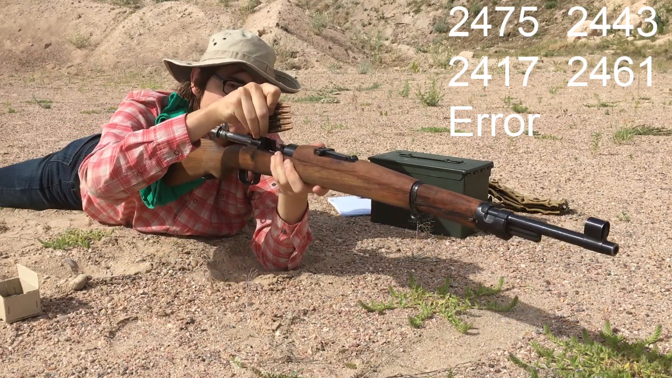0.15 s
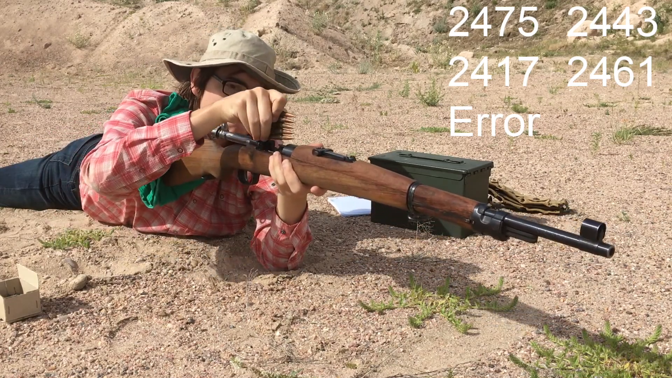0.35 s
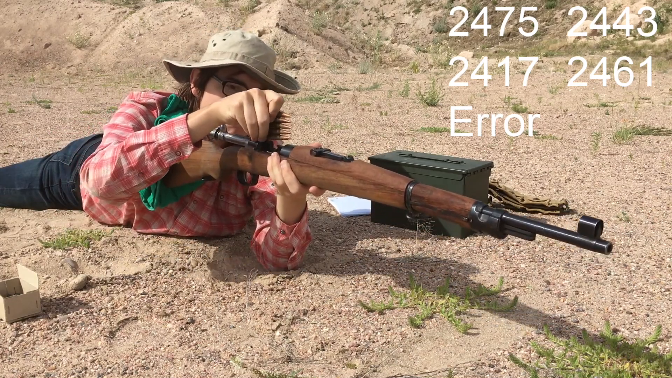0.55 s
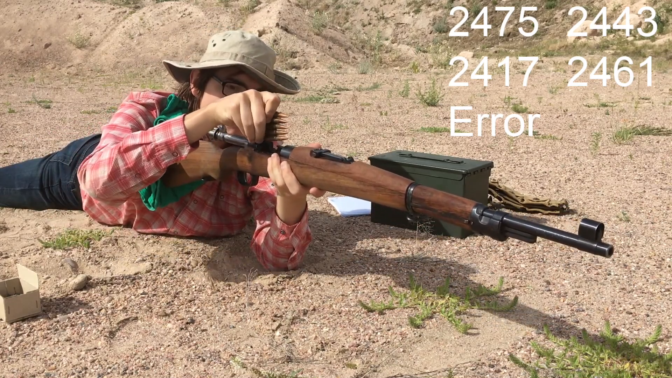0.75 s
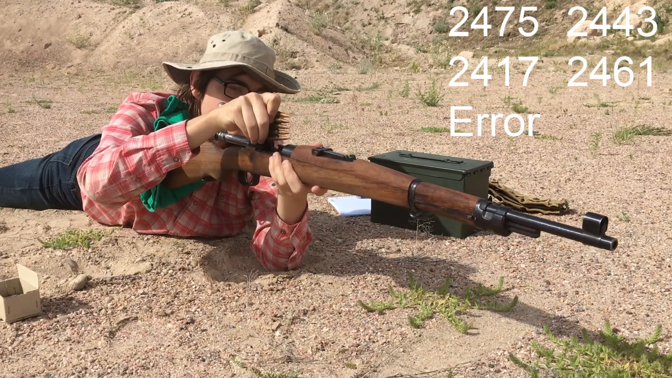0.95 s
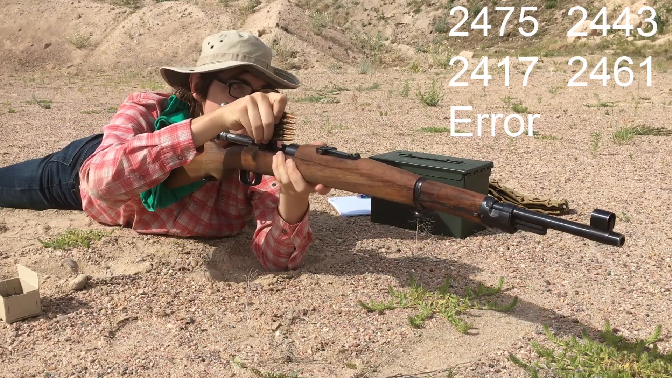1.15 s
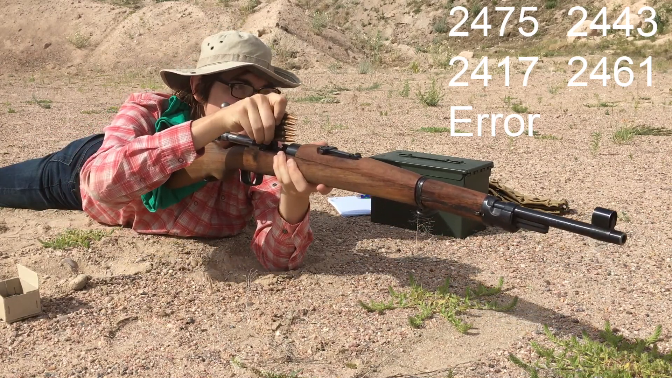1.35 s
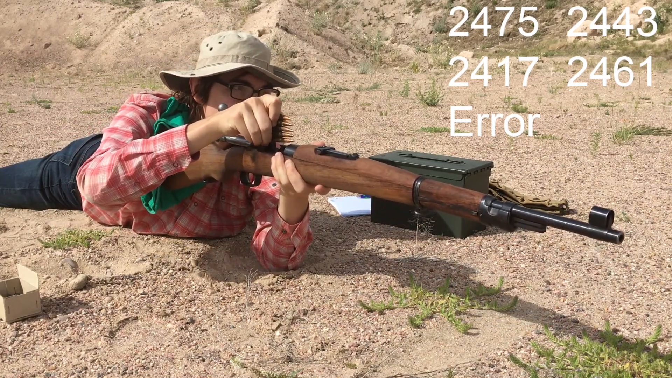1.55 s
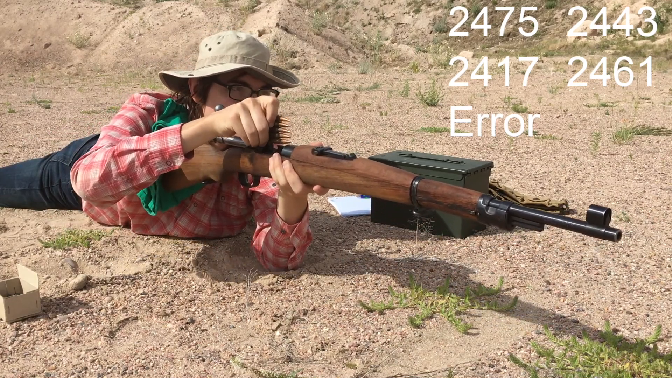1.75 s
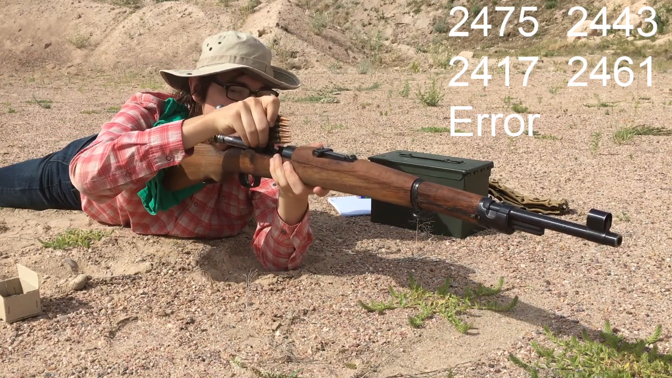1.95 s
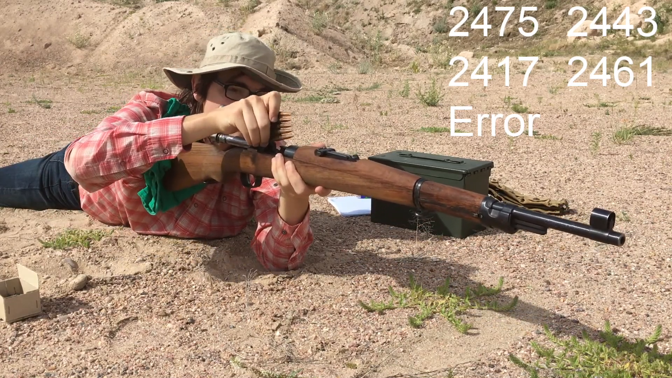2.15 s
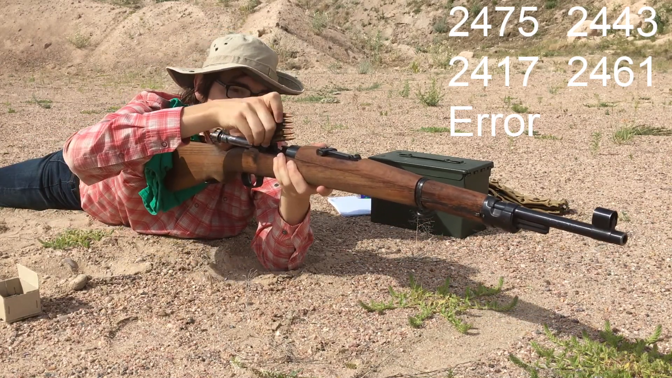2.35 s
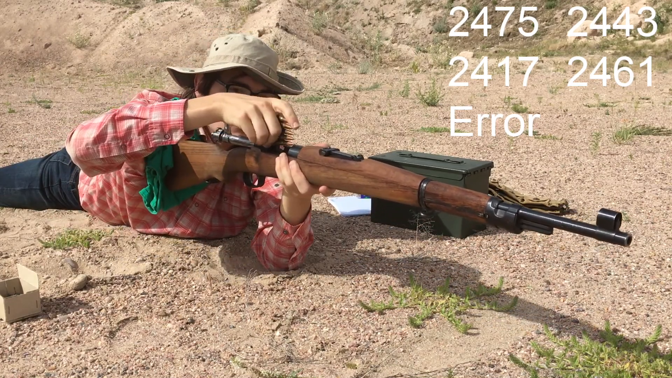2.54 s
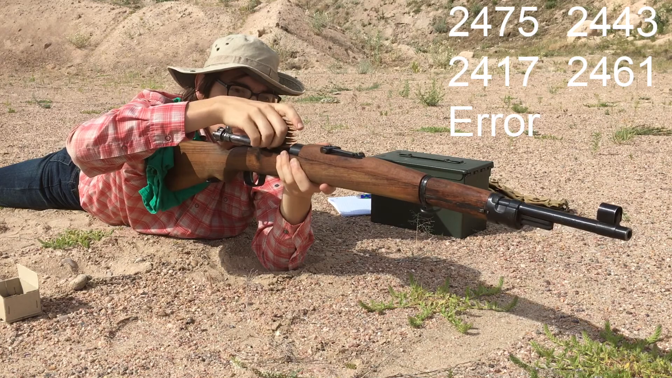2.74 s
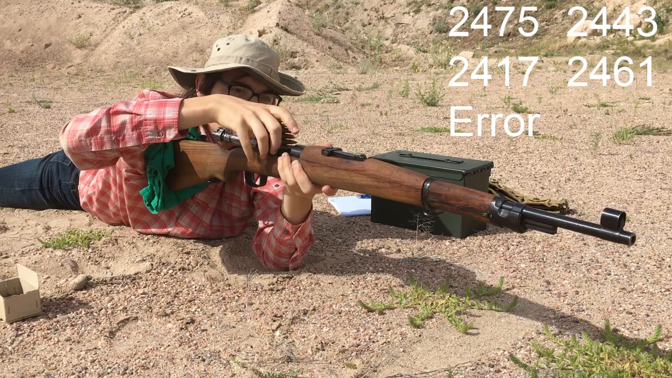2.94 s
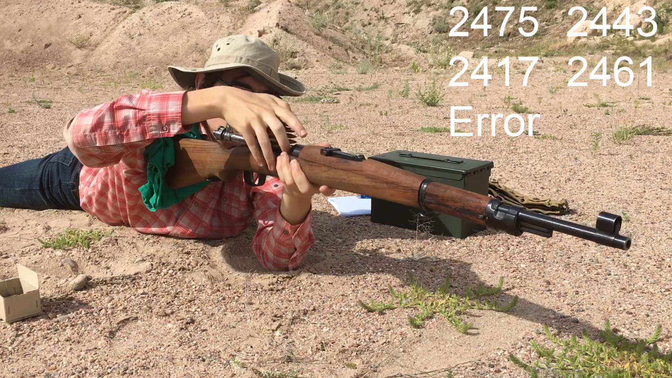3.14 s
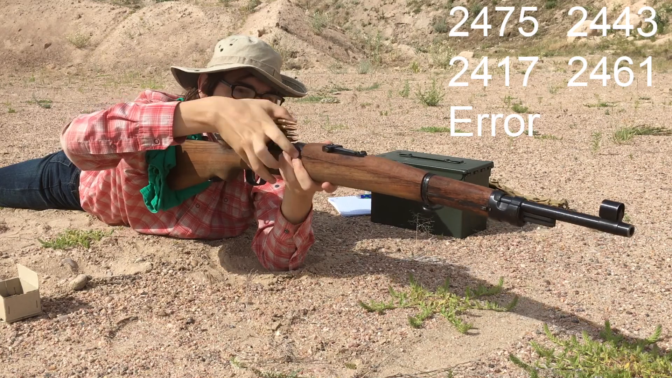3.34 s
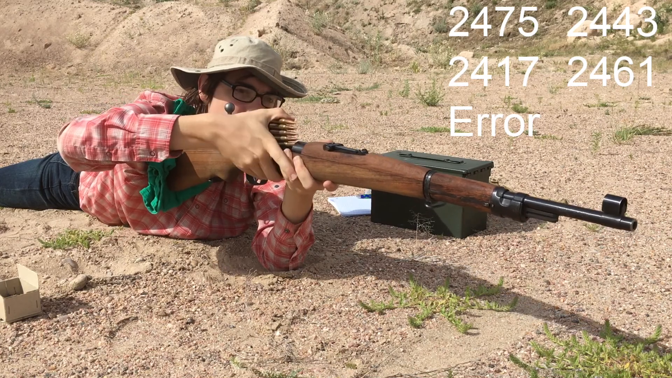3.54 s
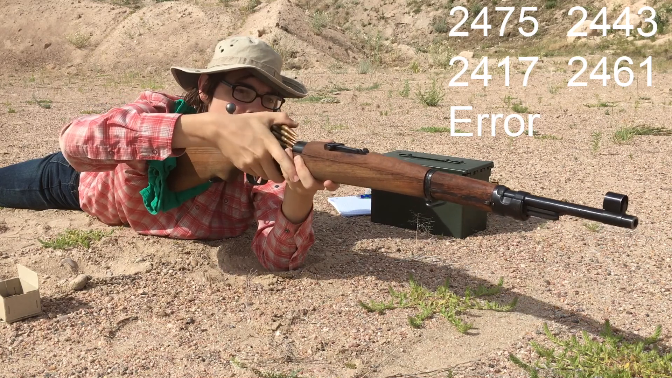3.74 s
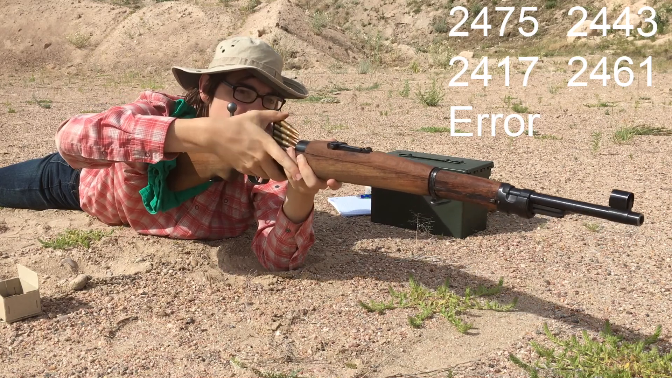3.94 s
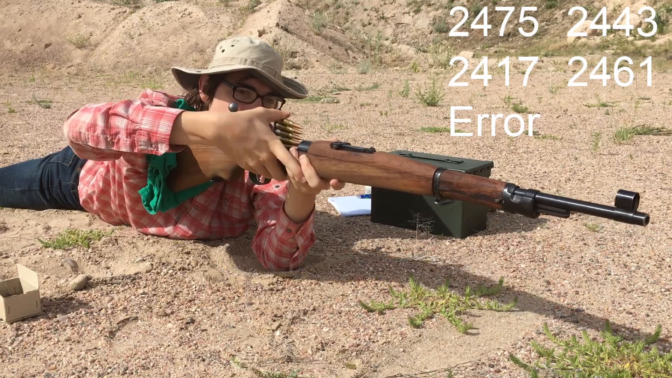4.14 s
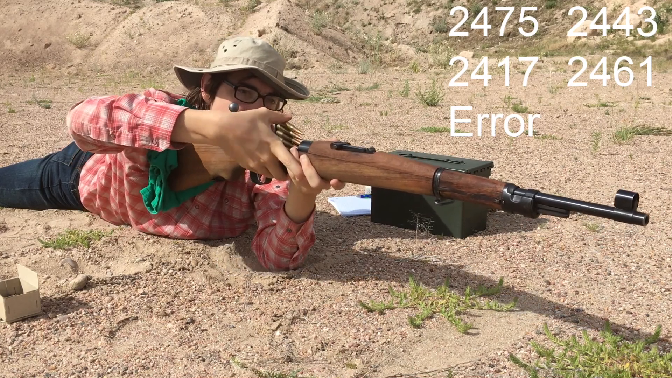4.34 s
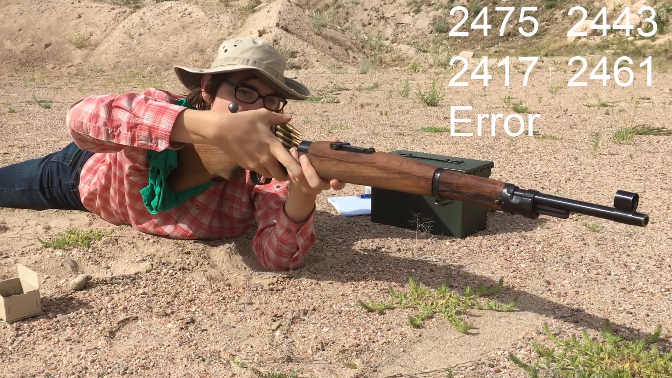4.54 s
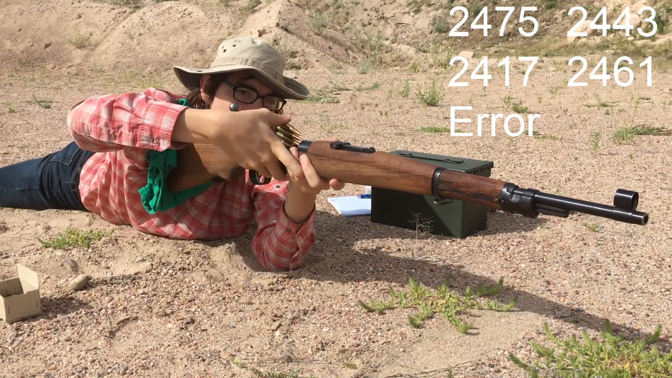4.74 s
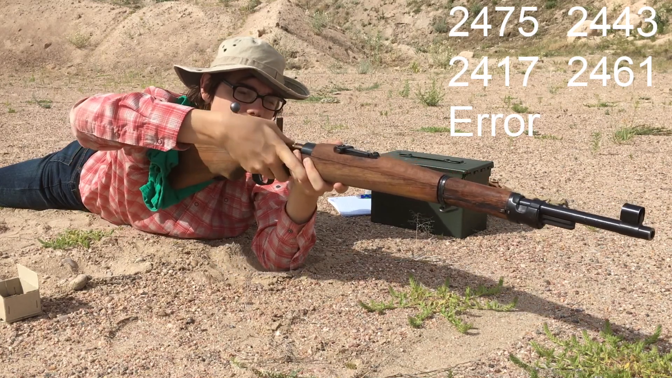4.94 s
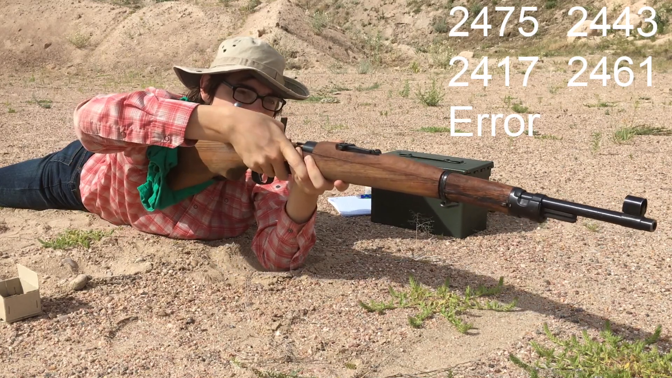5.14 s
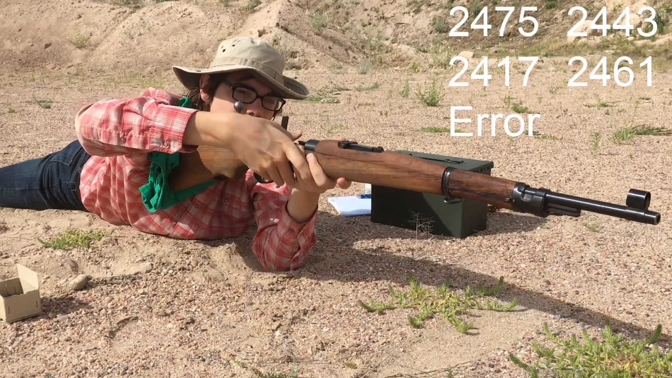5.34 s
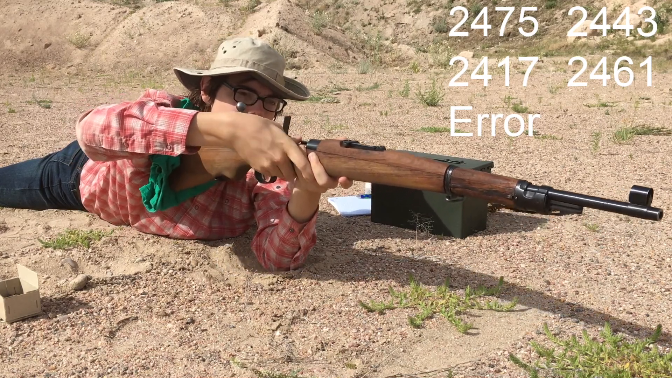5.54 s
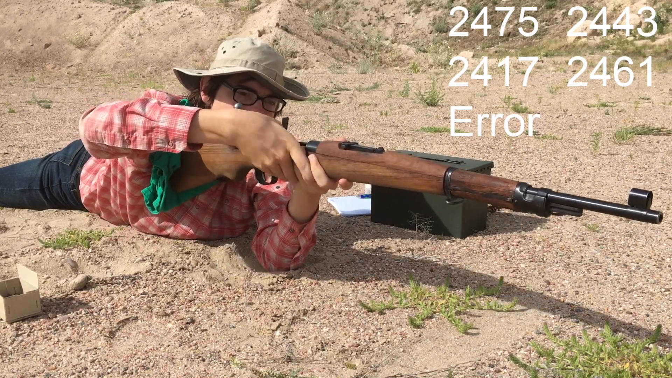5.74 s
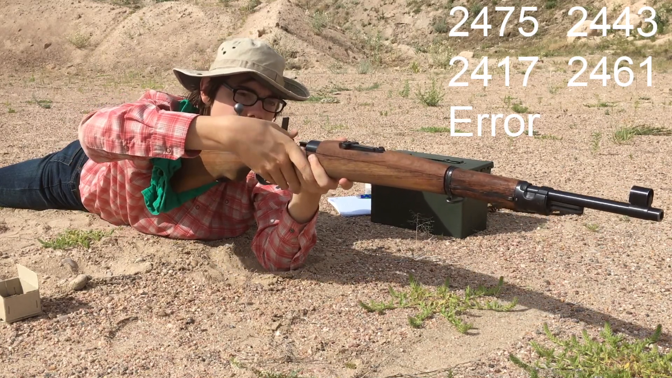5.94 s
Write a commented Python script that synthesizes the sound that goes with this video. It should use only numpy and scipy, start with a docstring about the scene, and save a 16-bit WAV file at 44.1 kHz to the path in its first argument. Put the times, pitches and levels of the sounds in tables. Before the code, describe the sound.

Outdoors on open ground, close and dry, cartridges are fitted to a bolt rifle: isolated wooden knocks and small metal ticks with faint scraping. After nearly five seconds they are pressed in with a loud, dense, bright clack, followed by quick clicks and rattles. Wind is a light low rumble at first, then gusts hard on the microphone with fluttering pops. Very faint hiss and a few tiny chirps lie beneath.

```python
"""A strip of brass cartridges is fitted to a bolt rifle and pressed into its magazine, then the bolt is worked.
Each contact is a few milliseconds of chatter exciting modes of the wooden stock, steel action and brass;
rubbing excites the same modes in between, and a loose steel part pings. Open ground, no echo.
Wind on the microphone is banded noise that rises to a gust, with pops made of pressure bumps;
a few faint chirps are gliding sines, and the hiss is noise with a shaped spectrum."""
import sys
import numpy as np
from scipy import signal
from scipy.fft import rfft, irfft
from scipy.io import wavfile
from scipy.ndimage import uniform_filter1d

SR = 44100
rng = np.random.default_rng(int(sys.argv[2]) if len(sys.argv) > 2 else 0)


def master(y):
    """Save y as 16-bit WAV."""
    cut = np.clip(np.atleast_2d(y).T, -1, 1)
    pcm = np.round(cut * 32767)  # scale
    wavfile.write(sys.argv[1], SR, pcm.astype(np.int16))


N = 268569
TIME = np.arange(N) / SR  # s


def undb(db):
    """Amplitude ratio of a level: 20 dB per factor of ten."""
    return 10 ** (np.asarray(db) / 20)


def unit(x):
    """Normalization to a root-mean-square value of 1."""
    return x / np.sqrt(np.mean(x ** 2))


def band(x, lo_hz, hi_hz, order=2):
    """Band limiting by a maximally flat (Butterworth) filter."""
    sos = signal.butter(order, [lo_hz, min(hi_hz, .45 * SR)], "band", fs=SR, output="sos")
    return signal.sosfilt(sos, x)


def ring(x, hz, t60):
    """Damped resonance: a two-pole mode that falls 60 dB in t60 seconds, with gain 1 for steady white noise."""
    radius = np.exp(-np.log(1000) / (t60 * SR))
    poles = [1, -2 * radius * np.cos(2 * np.pi * hz / SR), radius * radius]
    return signal.lfilter([1, 0, -1], poles, x) * np.sqrt((1 - radius * radius) / 2)


def walk(rate):
    """Slow random modulation: independent levels held 1 / rate seconds, then smoothed twice."""
    hold = max(int(SR / rate), 1)
    steps = np.repeat(rng.standard_normal(N // hold + 1), hold)
    return uniform_filter1d(uniform_filter1d(steps, hold), hold)[:N]


def grit(scatter_db):
    """Impulsive excitation: noise whose samples differ widely in size acts as a train of tiny impacts."""
    return unit(rng.standard_normal(N) * undb(scatter_db * walk(3000)))


def rifle():
    """Modal superposition: each mode of each part rings under its own chatter, so each contact has its own colour."""
    # modes of the wooden stock, the steel action and the brass cartridges:
    # (frequency [Hz], relative level [dB], t60 [s])
    stock_modes = [(444, -13, 0.023), (659.6, -7.5, 0.08), (1195.5, 1, 0.024), (1449, -2, 0.029),
                   (1699, 4, 0.013), (1953, 1.5, 0.0099), (2190, -4.5, .025)]
    steel_modes = [(3270, -5.5, 0.0077), (3295, -10, 0.055), (3600, -2.5, .02), (4100, -5, 0.01477),
                   (4480, -5, 0.037), (5320, -7.5, 0.013), (5630, -4, 0.017), (6202, -1.5, 0.014)]
    brass_modes = [(6940, 2.5, 0.0033), (8220, -2.5, .012), (9070, -4, 0.016), (9470, -2, 0.0067),
                   (11050, -8, 0.012), (11990, -7, 0.016)]
    # unresolved crack of stock, steel and brass: (low edge [Hz], high edge [Hz], level against its modes [dB])
    crack_bands = [(1085, 2380, 1.5), (2660, 5200, 0), (5900, 11970, -1.5)]
    parts = (stock_modes, steel_modes, brass_modes)
    out = 0
    for blow, rub, modes, (lo_hz, hi_hz, crack_db) in zip(blows(), rubs(), parts, crack_bands):
        force = np.hypot(blow, rub)  # independent forces add in power
        rings = sum(undb(db) * ring(force * grit(4.6), hz, t60) for hz, db, t60 in modes)
        # a slip is softer than a blow and cracks less
        crack_force = np.hypot(blow, .3 * rub)
        crack = band(crack_force * grit(6.0), lo_hz, hi_hz, order=3)
        crack = crack * np.sqrt(SR / 2 / (hi_hz - lo_hz))  # restores the power lost outside the band
        out = out + undb(-10.0) * (rings + undb(crack_db) * crack)
    return out + pings()


def blows():
    """Impact excitation: force on stock, steel and brass rises quickly, then the chatter dies away."""
    # contacts: (time [s], force on the stock [dB], steel over stock [dB], brass over steel [dB],
    # chatter time scale [ms])
    contacts = [(.1194, -64.5, -5, 3, 8.5), (0.1331, -50.5, -9, -8, 3.7), (0.3635, -39.5, 4.5, -7, 2.3),
                (0.3723, -49.5, -8.5, -6, 8), (0.598, -62.5, -14.5, 9, 5.9), (.681, -58.5, -27, 0, 8.5),
                (0.6985, -45.5, -16, -19, 3.9), (0.7067, -37, -20, -17, 3.6),
                (0.9816, -51, -6.5, -7.5, 2.8), (1.2314, -34.5, -13.5, 10, 2.3),
                (2.4357, -65.5, -5, 5, 8.5), (2.4544, -51, 11, 0.5, 0.7), (2.4595, -57.5, -9, 4, 5.3),
                (2.6015, -56.5, -3, -6, 3.3), (2.6602, -62.5, -3, -1, 13), (2.6764, -37, -5.5, -0.5, 4.5),
                (2.707, -61, -8, 4, 18), (2.727, -54.5, -11, -4, 11), (2.775, -81, 12, 2, 2.4),
                (2.805, -65, 16, 12, 1.5), (2.8144, -64, -6, 4, 2.4), (2.9582, -77, 10, 0.5, 2),
                (3.252, -54.5, -20, -9, 8.6), (3.615, -58.5, -7, -10, 12.4), (3.639, -37.5, 6, 2.5, 3.5),
                (3.6469, -43, -9, -24, 4.8), (3.9627, -60, 0, -15, 2.9), (3.974, -55, -5, -7.5, 11),
                (4.003, -60, -3, -12, 15), (4.1851, -41, -3.5, 1.5, 4.3), (4.1975, -41, -11.5, -6, 3.7),
                (4.268, -71.5, 6.5, 1, .7), (4.769, -51.5, 2, -15, 9.4), (4.776, -46.5, 12.5, -4.5, 15),
                (4.7848, -31, 6.5, 2.5, 6.8), (4.793, -24.5, 8, 3.5, 3.6), (4.8051, -23.5, 6.5, -5, 1.5),
                (4.8105, -34.5, 17, -4.5, 2.3), (4.8147, -25.5, -0.5, -3, 4.8), (4.8406, -47, -13, -4, 3.4),
                (4.879, -49, -2, -6, 3.4), (4.8854, -57, 2, -14, 5), (4.918, -56.5, -1.5, -18.5, 11),
                (4.9908, -51, 3, -8, 5), (5.0022, -64.5, 3, 1, 4.6), (5.022, -64.5, 11.5, 13.5, 4.6),
                (5.0336, -29, -2.5, 3, 2.23), (5.0501, -37.5, 6, 3.5, 3.7), (5.0722, -44.5, 8.5, -2.5, 2.1),
                (5.2775, -54.5, -20.5, -6, 3.7), (5.299, -46, -25.5, 8, 2.8), (5.3042, -46, -5, -11, 5.4),
                (5.349, -38, 0, -0.5, 3.1), (5.359, -51, -16, -2, 2.6), (5.373, -55, -9, 3, 3),
                (5.3985, -54, -21, -9, 2.2), (5.4209, -34.5, -12, -9, 2.7), (5.429, -35.5, 2.5, -3, 2.9),
                (5.4411, -47, 1, -12, 3.6), (5.4503, -39, -1.5, -2, 3.9), (5.5006, -46, -6, -17, 13),
                (5.516, -39, 10, -14, 1.37), (5.5272, -49.5, -2.5, -17, 2), (5.5504, -65.5, -14, -5, 4.2),
                (5.853, -60, -18, -10, 11), (5.885, -53, -18, -15.5, 4.3), (5.9246, -56, -11, -16, 4.9),
                (5.962, -57, -21, -6, 4), (5.9706, -47.5, 2, -22, 2.5), (5.9817, -54, 2, -17, 3.6),
                (5.992, -58, -3, -17, 4.9), (5.9977, -52.5, -14, -13, 7.9), (6.028, -57, -8, -13, 11.6),
                (6.072, -54, -11.5, -3, 2.4), (6.0837, -42.5, 11, -15.5, 1.28)]
    power = np.zeros((3, N))
    t = np.arange(-200, 3000) / SR
    after = np.maximum(t, 0)
    # loose parts go on rattling faintly, strongest in the stock
    rattle = undb([[-24], [-30], [-34]]) ** 2 * np.exp(-after / 0.00866)
    # the first touch is a hard tick above the chatter
    tick = 1.5 * np.exp(-after / 0.00021)
    for s, db, steel_db, brass_db, ms in contacts:
        part_db = np.array([db, db + steel_db, db + steel_db + brass_db])
        hold = max(ms, .5) / 1000  # s
        rise = np.exp(t / min(0.12 * hold, .0012))
        chatter = np.exp(-(after / (0.53 * hold)) ** 1.25)
        shape = np.where(t < 0, rise, chatter + tick + rattle)
        i = int((s + t[0]) * SR)
        n = min(len(t), N - i)
        power[:, i:i + n] += undb(part_db[:, None]) ** 2 * shape[:, :n]
    return np.sqrt(power)


def rubs():
    """Stick-slip friction: uneven force on the same parts sets in fast, catches at times and fades."""
    # rubbing of metal and cloth: (start [s], length [s], force on the stock [dB], steel over stock [dB])
    strokes = [(0.105, 0.053, -69.5, -6), (0.561, 0.12, -76.5, -12), (2.418, 0.047, -73.5, -3),
               (2.634, 0.21, -77, -12), (2.853, 0.4, -79.5, -3), (3.218, 0.33, -77.5, -3.5),
               (3.962, 0.085, -81, -5), (4.811, 0.16, -68.5, -3), (4.96, .15, -68, -4),
               (5.273, 0.28, -68.5, -9.5), (5.562, 0.086, -77.5, 1), (5.822, 0.17, -72, -8.5)]
    edge_share = 0.09  # of the length, at either end
    fade_db, brass_over_steel_db = -6.5, -9  # fade reached by the end of a rub
    catches_per_s, catch_db, catch_s = 55, -4.5, .006  # mean rate, gain over the rub, decay time constant
    rub = np.zeros((3, N))
    for s, length, db, steel_over_db in strokes:
        part = (TIME - s) / length
        edges = np.clip(np.minimum(part, 1 - part) / edge_share, 0, 1)
        shape = undb(fade_db * np.clip(part, 0, 1)) * edges
        steel_db = db + steel_over_db
        rub += undb([[db], [steel_db], [steel_db + brass_over_steel_db]]) * shape
    catch = (rng.random(N) < catches_per_s / SR) * rng.exponential(size=N)
    catch = signal.lfilter([1], [1, -np.exp(-1 / (catch_s * SR))], catch)
    return rub * undb(3.5 * walk(170)) * (1 + undb(catch_db) * catch)


def pings():
    """Free damped vibration: a loose steel part sounds as exponentially decaying sines."""
    # thin pings: (start [s], frequency [Hz], initial level [dB], t60 [s])
    free_modes = [(2.805, 5450, -44, .014), (3.647, 1775, -62, .22), (3.645, 1190, -63, .2),
                  (4.013, 1190, -75, .87)]
    out = np.zeros(N)
    for s, hz, db, t60 in free_modes:
        t = np.maximum(TIME - s, 0)
        out += undb(db) * np.exp(-np.log(1000) * t / t60) * np.sin(2 * np.pi * hz * t)
    return out


def wind():
    """Turbulence by eddy size: large eddies rumble, smaller flutter in bursts, the smallest need a strong gust."""
    # slow course of the wind on the microphone, weak at first, then rising to a gust:
    # (time [s], rumble level [dB])
    course = [(0, -62), (1, -64.5), (2.3, -61), (3.05, -63.5), (3.9, -57), (4.7, -55.5), (4.88, -35),
              (5.2, -37.5), (5.5, -35.5), (5.8, -34.5), (5.9, -40), (6.09, -39)]
    # puffs: (start [s], length [s], rumble level [dB], flutter over rumble [dB])
    puffs = [(0, 0.077, -48, -19), (0.095, 0.03, -66, 10), (.2, 0.074, -58.5, -20), (.35, 0.17, -60.5, -19),
             (0.757, 0.13, -51, -18.5), (1.123, 0.09, -55, -31), (1.386, .27, -46, -14.5),
             (1.758, 0.2, -53, -23), (2.019, .12, -46, -5.5), (2.36, 0.055, -62, -21),
             (2.599, .19, -52.5, -8.5), (3.295, 0.24, -63, -15), (3.616, 0.025, -56, -18),
             (3.74, .2, -60, -21), (4.362, 0.065, -50.5, -4), (4.467, 0.14, -48, -21),
             (4.679, 0.034, -47, -36), (4.934, 0.045, -38.5, 2), (4.998, 0.086, -36.5, -4),
             (5.105, 0.065, -29, -5), (5.217, 0.058, -29.5, -1), (5.309, 0.075, -26.5, -1.5),
             (5.562, 0.034, -29, -6.5), (5.612, 0.049, -25, -4), (5.673, .17, -31.5, -1.5),
             (5.9, 0.064, -44, -7.5), (6.004, 0.08, -31, -11.5)]
    puff_edge_s, course_flutter_over_rumble_db = 0.037, -12.5
    swirl_db, flutter_swirl_db = 1, 3.5  # depth of quick chance in the strength
    s, course_db = np.transpose(course)
    # two rows: rumble and flutter
    force = undb(np.interp(TIME, s, course_db)) * undb([[0], [course_flutter_over_rumble_db]])
    for s, length, db, over_db in puffs:
        inside_s = np.minimum(TIME - s, s + length - TIME)
        puff = np.clip(inside_s / puff_edge_s + .5, 0, 1) ** 2
        force = force + undb([[db], [db + over_db]]) * puff
    rumble_db, flutter_db = 20 * np.log10(force) + swirl_db * walk(17)
    flutter_db = flutter_db + flutter_swirl_db * walk(25)
    rumble = unit(band(rng.standard_normal(N) * undb(1.8 * walk(18)), 33, 88, order=3))
    flutter = unit(band(rng.standard_normal(N) * undb(5.8 * walk(36)), 91, 207.7, order=3))
    grain = unit(band(rng.standard_normal(N) * undb(8.7 * walk(90)), 270, 560, order=4))
    # the smallest eddies grow 1.68 dB per dB of flutter
    grain_db = flutter_db - 13.5 + 0.68 * (flutter_db + 29)
    return undb(rumble_db) * rumble + undb(flutter_db) * flutter + undb(grain_db) * grain


def pops():
    """Pressure pulses: each eddy is one smooth bump, push or pull; the narrower it is, the wider its spectrum."""
    # pops, each a cluster of small eddies: (time [s], level [dB])
    clusters = [(2.025, -51.5), (2.108, -55), (4.411, -56.5), (4.945, -35.5), (4.993, -38), (5.119, -43),
                (5.155, -38.5), (5.231, -33.5), (5.247, -28.5), (5.339, -42.5), (5.518, -38.5),
                (5.575, -38.5), (5.628, -33), (5.696, -30.5), (5.737, -29.5), (5.758, -31.5),
                (5.777, -31.5), (5.788, -31), (5.812, -35), (5.835, -38.5), (6.05, -42)]
    spread_ms = 13.5  # the eddies of a pop are scattered over this time
    # the stronger a pop, the narrower its eddies: width scale at a reference level, and its slope
    eddy_ms, eddy_at_db, eddy_ms_per_db = 0.35, -31, .024
    out = np.zeros(N)
    chance = rng.random((len(clusters), 3, 10, 1))  # ten eddies a pop
    ms = np.arange(1500) / SR * 1000
    for (s, db), (when, wide, push) in zip(clusters, chance):
        scale_ms = max(eddy_ms + eddy_ms_per_db * (eddy_at_db - db), .2)
        width_ms = scale_ms * (1.87 + 2.4 * wide)
        bumps = (1 + ((ms - 3 - spread_ms * when) / width_ms) ** 2) ** -2.5
        pressure = ((push - .5) * bumps).sum(axis=0)
        pop = unit(band(pressure, 97, 2600))
        i = int((s - .003) * SR)
        n = min(len(ms), N - i)
        out[i:i + n] += undb(db) * pop[:n]
    return out


def chirps():
    """Frequency modulation: the phase of a short whistle is the running sum of its gliding frequency."""
    # faint chirps: (start [s], length [s], first frequency [Hz], last frequency [Hz], peak level [dB])
    glides = [(.005, 0.029, 3050, 3400, -77), (1.316, 0.067, 3270, 3670, -78.5),
              (2.073, 0.011, 1610, 1500, -70), (2.078, 0.016, 2250, 2960, -61),
              (2.091, 0.0091, 2100, 2220, -60), (2.093, 0.023, 1830, 1780, -69.5)]
    out = np.zeros(N)
    for s, length, from_hz, to_hz, db in glides:
        n, i = int(length * SR), int(s * SR)
        phase = 2 * np.pi * np.cumsum(np.linspace(from_hz, to_hz, n)) / SR
        out[i:i + n] += undb(db) * np.hanning(n) * np.sin(phase)
    return out


def hiss():
    """Stationary noise of air and amplifier: a white spectrum is weighted by a fixed spectral density."""
    # noise spectrum: (frequency [Hz], relative density [dB per Hz])
    density = [(150, -39), (250, 0.5), (775, -11.5), (1160, -13), (2910, -16), (3710, -16), (4900, -19.5),
               (6250, -18), (12300, -22), (14400, -21), (16000, -45.5)]
    hz, db = np.transpose(density)
    f = np.arange(N // 2 + 1) * SR / N + 1  # 1 Hz up, to keep the logarithm finite
    weight = undb(np.interp(np.log(f), np.log(hz), db))
    return undb(-77.5) * unit(irfft(rfft(rng.standard_normal(N)) * weight, N))


def scene():
    """Linear superposition of all sources at one microphone."""
    return (rifle() + wind() + pops() + chirps() + hiss())[None]


def record(dry):
    """Band limits of the chain: the microphone loses the deepest rumble, the recorder cuts the top."""
    heard = signal.sosfilt(signal.butter(3, 40, "high", fs=SR, output="sos"), dry)
    top_hz = 16200
    return signal.sosfilt(signal.ellip(10, .2, 80, top_hz, fs=SR, output="sos"), heard)


dry = scene()
out = record(dry)
master(out)
```